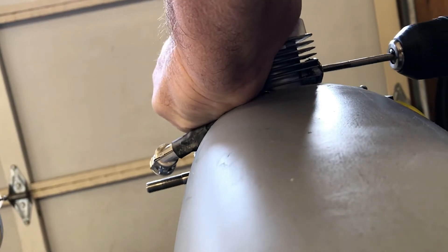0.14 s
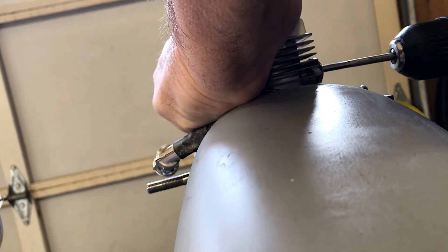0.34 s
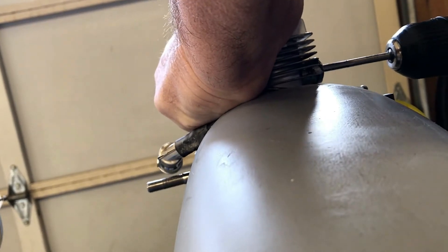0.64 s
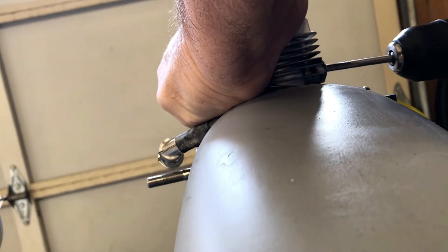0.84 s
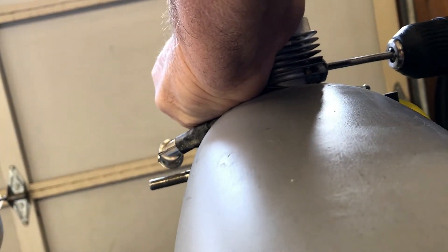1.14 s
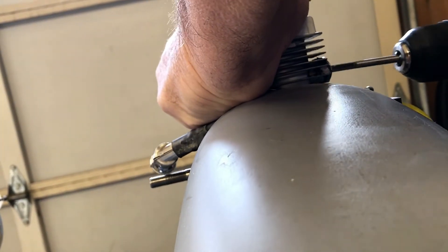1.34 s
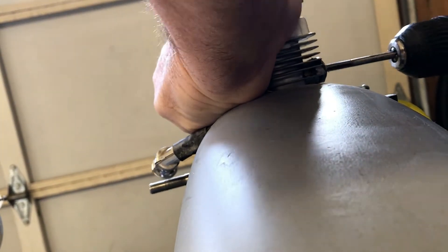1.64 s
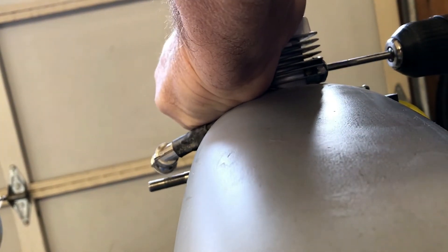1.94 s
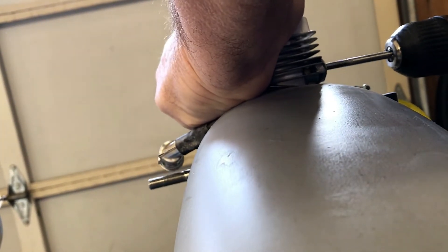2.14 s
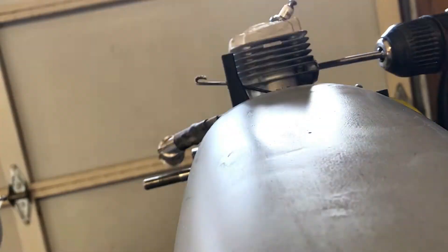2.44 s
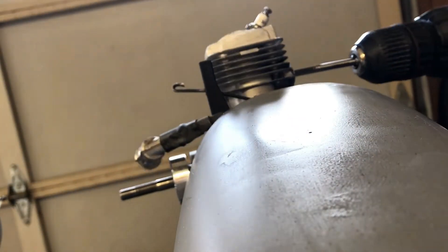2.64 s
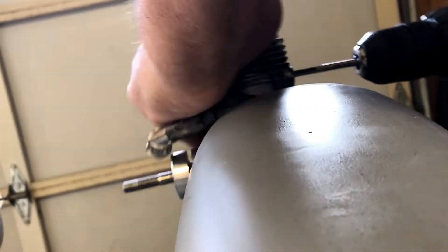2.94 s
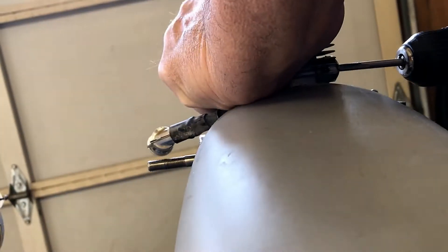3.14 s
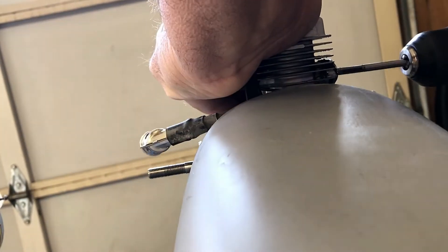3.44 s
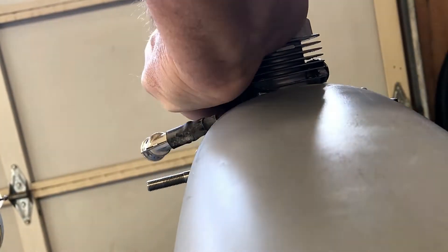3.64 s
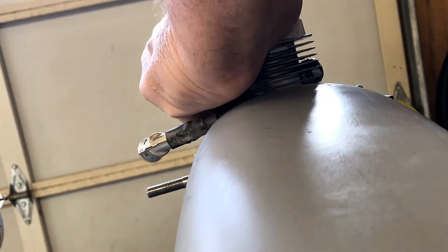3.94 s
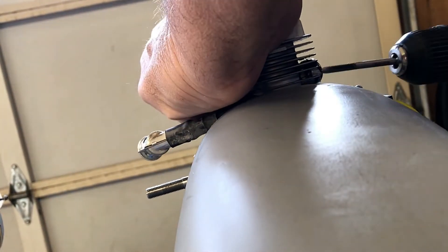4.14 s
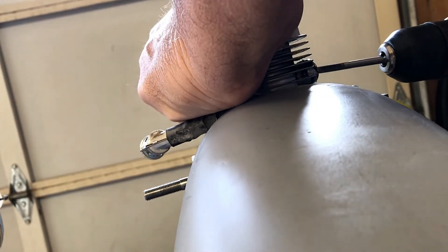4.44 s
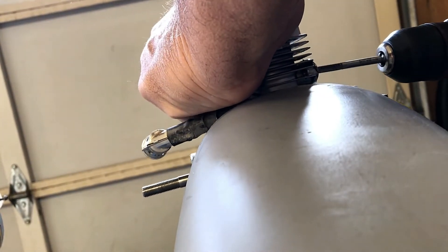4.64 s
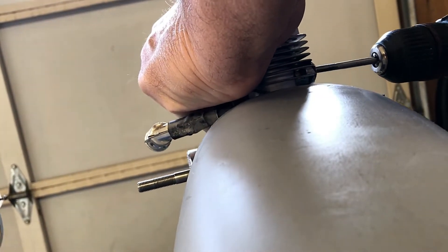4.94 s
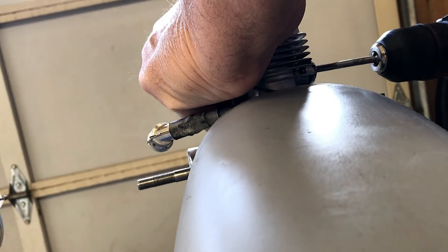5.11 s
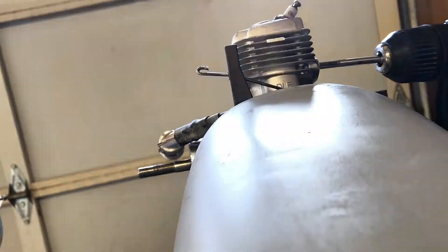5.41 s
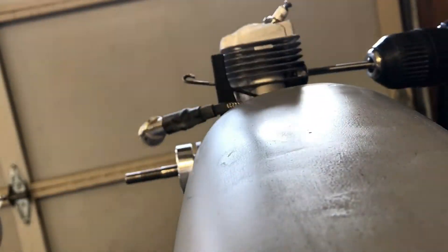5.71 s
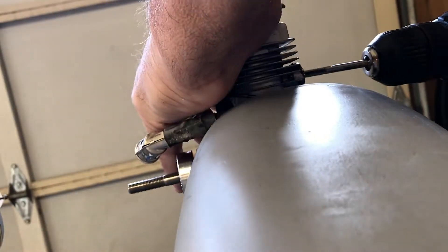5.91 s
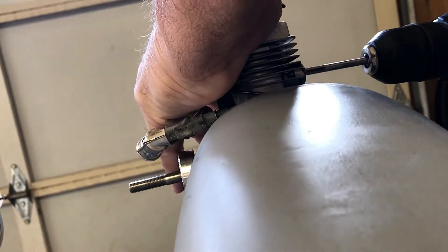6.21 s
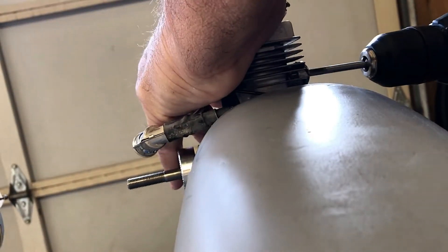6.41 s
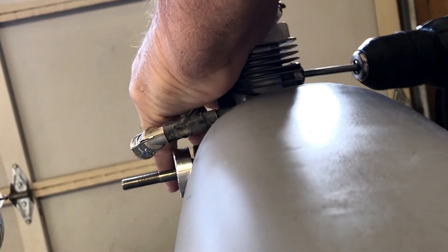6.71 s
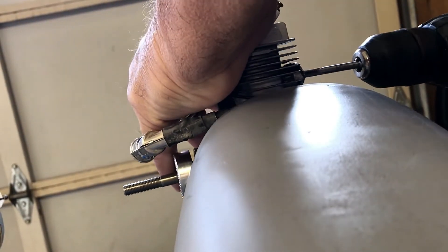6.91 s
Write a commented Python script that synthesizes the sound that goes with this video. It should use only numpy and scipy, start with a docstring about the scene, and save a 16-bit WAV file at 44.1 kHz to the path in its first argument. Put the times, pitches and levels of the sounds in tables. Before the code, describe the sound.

A thread tool is turned by hand inside an aluminium engine cylinder, heard close in a quiet garage. Fizzy, streaky metal rubbing comes in separate strokes, with thin high whistles early on and small ticks of swarf. Clicks, light knocks and finger brushing fill the gaps; a strong rasp bursts out midway, and rough squeaks crowd the final strokes.

```python
"""A bright, streaky hiss comes first, close by over faint steady air: a thread tool is wound by hand,
stroke by stroke, into a hole in an aluminium engine cylinder. Shaped noise makes the rubbing, short noise
flares the rasps, paired sines the whistles, and resonant overtone series the stick-slip squeaks.
Between strokes the loose tool clicks and knocks: noise bursts, also heard through the cylinder's
resonances. A garage answers briefly and faintly; both channels are alike."""
import sys
import numpy as np
from scipy import signal
from scipy.fft import rfft, irfft, next_fast_len
from scipy.io import wavfile
from scipy.ndimage import map_coordinates

SR = 44100
rng = np.random.default_rng(int(sys.argv[2]) if len(sys.argv) > 2 else 0)


def store_pcm(level_fs):
    """Save levels as 16-bit WAV."""
    pcm = np.round(np.clip(level_fs, -1, 1) * 32767).astype(np.int16)
    wavfile.write(sys.argv[1], SR, np.atleast_2d(pcm).T)


N = 311542
TOP_HZ = 15950  # upper band limit

# resonances of the cylinder: f/Hz, width/Hz, level/dB
CASTING = [(720, 380, -2), (1610, 140, 12.5), (2820, 770, -3.5), (4350, 580, -8), (5320, 400, -6)]
# steady stick-slip of the edge: t/s, length/s, slip rate f/Hz, ring f/Hz, level/dB of the ring
LOCKS = [(0.161, 0.058, 816, 7400, -41), (1.926, 0.026, 2310, 4720, -43), (2.008, 0.025, 816, 6900, -44.5),
         (2.189, 0.05, 2755, 8300, -35), (2.264, 0.03, 7540, 7500, -34.5),
         (4.953, 0.0349, 1230, 15000, -45), (5.162, 0.02, 2766, 8280, -39),
         (5.287, 0.018, 4710, 9400, -34.5)]


def amp(db):
    """Level and gain: 20 dB is a factor of ten in amplitude."""
    return 10 ** (np.asarray(db) / 20)


def unit(x):
    """Normalisation to an rms of 1."""
    return x / np.sqrt(np.mean(x ** 2) + 1e-20)


def along(points, hz):
    """Spectral gain, by interpolating (f/Hz, level/dB) points on a log frequency axis."""
    f, db = np.transpose(points)
    return amp(np.interp(np.log(hz + 1), np.log(f), db))


def wobble(rate, size=N):
    """Smooth random fluctuation: a spline through Gaussian knots, rate of them a second."""
    knots = rng.standard_normal(4096)
    return map_coordinates(knots, [np.arange(size) * rate / SR], mode="wrap")


def filtered(x, response):
    """Linear filtering: the spectrum of x times a frequency response."""
    m = next_fast_len(len(x) + SR // 4)
    spectrum = rfft(x, m) * response(np.fft.rfftfreq(m, 1 / SR))
    return irfft(spectrum, m)[:len(x)]


def coloured(x, spectrum):
    """Spectral shaping of x, at an rms of 1."""
    return unit(filtered(x, lambda hz: along(spectrum, hz)))


def add(track, s, sound):
    """Superposition: a sound joins the track at time s."""
    start = max(round(s * SR), 0)
    track[start:start + len(sound)] += sound[:max(len(track) - start, 0)]


def gate(length, attack=0.0015, release=0.0011):
    """Time axis and linear attack-hold-release envelope of one contact, in s."""
    t = np.arange(int(length * SR)) / SR
    return t, np.clip(np.minimum(t / attack, (length - t) / release), 0, 1)


def phase_of(hz):
    """Phase in radians as the integral of a moving frequency."""
    return 2 * np.pi * np.cumsum(hz) / SR


def casting(x, modes=CASTING):
    """Modal response: a force excites damped resonances, summed with alternating sign."""
    def response(f):
        total = 0
        for k, (centre, width, db) in enumerate(modes):
            damping = 1j * f * width
            total = total + (-1) ** k * amp(db) * damping / (centre * centre - f * f + damping)
        return total
    return filtered(x, response)


def crack(t, t60, tail_db):
    """Impact noise: exponential decay to -60 dB in t60 s with a slower tail, at a peak of 1."""
    decay = amp(-60 * t / t60) + amp(tail_db - 60 * t / 0.13)
    burst = rng.standard_normal(len(t)) * decay
    return burst / np.abs(burst).max()


def tightness():
    """Varying normal force: tight and loose spots pass as smooth swells and dips, in dB."""
    # the thread binds (+) or runs free (-): t/s of the middle, length/s, change/dB
    binds = [(0.101, 0.17, 9.5), (0.452, 0.073, 5), (0.716, 0.18, 6.5), (0.827, .13, 3.5),
             (0.94, 0.074, -7), (1.847, 0.3, 13.5), (1.942, 0.13, -7), (4.623, 0.052, 6),
             (4.761, 0.27, 4.5), (4.894, 0.047, 6), (5.076, .12, 7.5), (5.151, 0.15, -6),
             (5.194, 0.023, 6.5), (5.248, 0.023, 8.5), (5.921, 0.047, 12.5), (6.285, 0.26, 5.5),
             (6.395, 0.12, 8), (6.469, 0.066, -9.5)]
    tight_db = np.zeros(N)
    for s, length, db in binds:
        add(tight_db, s - length / 2, db * np.hanning(int(length * SR)))
    return tight_db


def air():
    """Stationary noise: the quiet air of the garage."""
    # spectrum of the air: f/Hz, relative level/dB per Hz
    air_spectrum = [(140, -63), (300, -11), (560, -1), (1600, -5.5), (2500, -11), (8000, -21.5)]
    return amp(-51.0) * coloured(rng.standard_normal(N), air_spectrum)


def garage(x):
    """Reverberation: the walls answer with a short, exponentially decaying tail of noise."""
    t = np.arange(SR // 2) / SR
    decay = amp(-60 * t / 0.12)  # 60 dB in 0.12 s
    tail = coloured(rng.standard_normal(len(t)), [(100, -6), (1500, 10), (12000, -16)]) * decay
    return signal.fftconvolve(x, tail / np.linalg.norm(tail))[:N]


def grip():
    """Light friction: the fingers brush over the metal as they shift, a fluctuating noise."""
    # shifts of the fingers: t/s, length/s, level/dB before the fluctuation
    grips = [(2.379, 0.11, -43), (2.658, 0.44, -49.5), (3.569, 0.066, -41.5), (3.678, 0.57, -51),
             (5.388, 0.13, -48.5)]
    touch = np.zeros(N)
    for s, length, db in grips:
        add(touch, s, amp(db) * np.hanning(int(length * SR)))
    return touch * amp(9 * np.tanh(wobble(150))) * unit(rng.standard_normal(N))


def swarf():
    """Random impulses: tiny chips crack in the thread and tick faintly in the casting."""
    chance, size = rng.random(N), rng.standard_normal(N)
    impulses = (chance < 55 / SR) * amp(9 * np.tanh(size))  # 55 a second on average
    one_tick = crack(np.arange(SR // 100) / SR, t60=.003, tail_db=-60)
    ticks = signal.fftconvolve(impulses, one_tick)[:N]
    return amp(-36.5) * ticks + amp(-31) * casting(ticks)


def blows(contacts, modes):
    """Impact excitation: dull contacts are heard only through the resonances they strike."""
    out, t = np.zeros(N), np.arange(SR // 20) / SR
    for s, db in contacts:
        ring = casting(crack(t, t60=.012, tail_db=-13), modes)
        add(out, s, amp(db) * ring / np.abs(ring).max())
    return out


def thuds():
    """Coupled modes: the cylinder rocks on its support, whose broad low mode replaces its own lowest."""
    # rocking contacts: t/s, peak level/dB
    rocks = [(2.907, -25), (2.927, -32), (2.94, -18.5), (2.965, -22.5), (4.135, -25.5)]
    # mode of the support: f/Hz, width/Hz, level/dB
    support = [(720, 820, 12)]
    return blows(rocks, CASTING[1:] + support)


def knocks():
    """Impact excitation: the loose tool taps the cylinder and its modes answer."""
    # taps: t/s, peak level/dB
    taps = [(2.435, -30), (2.987, -22), (3.178, -24), (5.466, -29.5), (5.592, -22), (5.595, -27),
            (5.664, -21), (5.668, -21), (6.73, -25.5)]
    return blows(taps, CASTING)


def clicks():
    """Damped impact: edges snap over chips with little bass; the hand damps the metal's ring."""
    # sharp metal contacts: t/s, peak level/dB of the snap before filtering
    contacts = [(.98, -24), (1.1277, -10.5), (1.1886, -11), (1.6356, -8), (2.677, -23), (2.707, -22),
                (2.9958, -15), (3.5165, -11), (3.7624, -7.5), (3.818, -18), (3.988, -21), (4.003, -25),
                (4.019, -22), (4.032, -20.5), (4.135, -22), (5.4165, -19), (6.652, -19), (6.7086, -11)]
    snap, t = np.zeros(N), np.arange(SR // 20) / SR
    for s, db in contacts:
        add(snap, s + 0.00082, amp(db) * crack(t, t60=0.0068, tail_db=-31.0))
    corner_hz = 900  # first-order high-pass
    direct = filtered(snap, lambda hz: 1j * hz / (1j * hz + corner_hz))
    return direct + amp(-6.0) * casting(snap)


def slips():
    """Release of stored twist: sliding noise flares up quickly and dies a little more slowly."""
    # rasps: t/s of the peak, hiss level/dB, body level/dB, both before the swell
    rasps = [(0.152, -24.5, -38.5), (0.241, -27.5, -49), (.299, -28, -47), (1.57, -33.5, -29),
             (1.979, -19, -29.5), (2.056, -22, -38), (2.245, -20.5, -30.5), (2.309, -19, -30.5),
             (3.178, -24.5, -55), (3.67, -9.5, -13.5), (3.925, -20.5, -26.5)]
    # spectra: f/Hz, relative level/dB per Hz
    hiss_spectrum = [(2500, -20.5), (11000, 1.5), (16000, -0.5)]
    body_spectrum = [(200, -6), (900, -3.5), (2700, 1.5), (4500, -0.5), (8000, -10)]
    hiss, body, t = np.zeros(N), np.zeros(N), np.arange(SR // 10) / SR
    middle = t.mean()
    width = np.where(t < middle, .0045, .006)  # s, rise and fall
    swell = 1.07 * np.exp(-.5 * ((t - middle) / width) ** 2)
    for s, hiss_db, body_db in rasps:
        add(hiss, s - middle, amp(hiss_db) * swell)
        add(body, s - middle, amp(body_db) * swell)
    hiss = hiss * coloured(rng.standard_normal(N), hiss_spectrum)
    return hiss + body * coloured(rng.standard_normal(N), body_spectrum)


def stick_slip(pitch, edge_hz, upper_gain=0):
    """Relaxation oscillation: uneven overtones, heard through the body and through the edge's ring."""
    # response of the body: f/Hz, level/dB
    body_response = [(900, -3.5), (1800, -2), (2700, -4), (3600, -26)]
    k = np.arange(1, 15)[:, None]
    flare = amp(3.2 * np.array([wobble(110, len(pitch)) for _ in k]))
    phase = k * phase_of(pitch) + 0.3 * rng.standard_normal(k.shape)
    overtones = flare * np.sin(phase) * (k * pitch < TOP_HZ)

    def mode(ratio):
        return np.hypot(k * pitch / ratio - edge_hz, 380) ** -1.3

    resonance = mode(1) + upper_gain * mode(1.85)
    body = unit(np.sum(overtones * along(body_response, k * pitch), axis=0))
    ring = unit(np.sum(overtones * resonance, axis=0))
    return body, ring


def squeaks():
    """Stick-slip: pitch settles after a rough break-away, the ring rises mid-squeak, light ones stay rough."""
    # squeaks: t/s, length/s, starting f/Hz, settled f/Hz, body level/dB, peak ring level/dB,
    # f/Hz the ring is driven towards (lowered by the arch and the cap below)
    bursts = [(2.682, 0.011, 1120, 1010, -32.5, -64, 2600), (2.712, 0.025, 1006, 796, -37, -43, 2650),
              (2.746, 0.034, 767, 900, -40, -52, 1900), (2.763, 0.038, 960, 775, -38.5, -45, 2580),
              (2.829, 0.049, 1280, 890, -39, -60, 1920), (4.259, 0.03, 1454, 1094, -37.5, -31.5, 5380),
              (5.853, 0.05, 1015, 906, -29.5, -37, 6940), (5.919, 0.033, 1040, 848, -36, -25.5, 4160),
              (5.952, 0.03, 1016, 855, -33, -28, 5400), (5.992, 0.028, 926, 933, -35, -22.5, 7800),
              (6.015, 0.047, 880, 917, -32.5, -29.5, 8060), (6.089, 0.036, 1114, 850, -36.5, -24, 8260),
              (6.398, 0.06, 908, 820, -34, -39, 6100), (6.477, 0.0186, 858, 906, -32, -61, 3260),
              (6.514, 0.031, 867, 910, -34, -28, 5400), (6.54, 0.049, 850, 744, -38, -32.5, 3860),
              (6.889, 0.02, 1365, 837, -29, -25.5, 6800), (6.909, 0.027, 946, 792, -33.5, -25.5, 3590),
              (6.94, 0.034, 820, 993, -32.5, -32.5, 4200)]
    settle_s, ring_arch = 0.016, 0.71  # ring_arch: share by which the ring starts and ends lower
    edge_mode_hz = 5720  # the ring climbs no higher
    grit_spectrum = [(300, -30), (1700, 14), (14000, -7)]
    out = np.zeros(N)
    for s, length, first_hz, last_hz, body_db, ring_db, ring_hz in bursts:
        light = np.clip(amp(-33 - body_db), .7, 2)  # a weaker body means a lighter contact
        t, envelope = gate(length, release=0.0026 * light ** 2)
        rough = light ** 1.4 + 2 * np.exp(-t / .005)
        jitter = .013 * wobble(90, len(t)) + .018 * rough * wobble(900, len(t))
        glide = last_hz + (first_hz - last_hz) * np.exp(-t / settle_s)
        pitch = glide * (1 + jitter)
        swell = np.sin(np.pi * t / length)
        edge_hz = np.minimum(ring_hz * (1 - ring_arch * (1 - swell)), edge_mode_hz)
        body, ring = stick_slip(pitch, edge_hz, 0.11 * ring_hz / edge_mode_hz)
        pulses = 1 + np.cos(phase_of(pitch))
        grit = coloured(rng.standard_normal(len(t)) * pulses, grit_spectrum)
        chatter = unit(amp(1.1 * rough * wobble(300, len(t))))
        voice = amp(body_db) * (body + amp(-24) * rough * grit) + amp(ring_db) * swell * ring
        add(out, s, envelope * chatter * voice)
    return out


def locks():
    """Steady stick-slip of the edge: thin, high tones over a low note or overtones."""
    sag = 0.137  # share by which the low note falls as the tool slows
    out = np.zeros(N)
    for s, length, slip_hz, ring_hz, db in LOCKS:
        t, envelope = gate(length)
        rate = slip_hz * (1 + .007 * wobble(600, len(t)))
        ring = stick_slip(rate, ring_hz)[1]
        body = unit(np.sin(phase_of(rate * (1 + sag * (.5 - t / length)))))
        add(out, s, amp(db) * envelope * (ring + amp(-9.5) * body))
    return out


def squeals():
    """Self-excited vibration: one mode takes over, drifts with the hand, flickers with the contact."""
    # cutting squeals: t/s, length/s, first f/Hz, last f/Hz, level/dB
    glides = [(0.039, 0.029, 1543, 1840, -41), (0.092, 0.02, 1880, 1410, -39),
              (1.347, 0.092, 1588, 1940, -43.5), (3.164, 0.25, 14000, 13410, -41),
              (3.444, 0.074, 2630, 2890, -38.5), (4.379, 0.062, 1590, 1734, -40.5),
              (4.55, 0.25, 14400, 13900, -43)]
    out = np.zeros(N)
    for s, length, first_hz, last_hz, db in glides:
        t, envelope = gate(length, attack=0.0094, release=0.0066)
        drift = 70 * wobble(866, len(t)) + 55 * wobble(62.0, len(t))  # Hz
        phase = phase_of(np.linspace(first_hz, last_hz, len(t)) + drift)
        flicker = amp(3 * wobble(70, len(t)))
        octave = amp(-10) * np.sin(2 * phase) * (2 * first_hz < TOP_HZ)
        add(out, s, amp(db) * envelope * unit(flicker * (np.sin(phase) + octave)))
    return out


def whistles():
    """Mode splitting: two close modes of the edge sing and part as the thread binds; the lower has an octave."""
    # whistles: t/s, length/s, upper mode's first, middle and last f/Hz, level/dB before the wobble
    songs = [(0.307, 0.62, 7760, 8400, 8400, -38.5), (1.199, 0.23, 7700, 7500, 7550, -40.5),
             (4.217, 0.2, 8570, 7700, 7430, -42.5), (4.426, 0.11, 8230, 7950, 8570, -39)]
    tight_db = tightness()
    split_hz = 560 + 77 * np.maximum(tight_db, 0)  # grows by 77 Hz per dB
    out = np.zeros(N)
    for s, length, first_hz, middle_hz, last_hz, db in songs:
        t, envelope = gate(length, attack=0.0055, release=0.036)
        curve = np.polyfit([0, .5, 1], [first_hz, middle_hz, last_hz], 2)
        high_hz = np.polyval(curve, t / length)
        low_hz = high_hz - split_hz[int(s * SR):][:len(t)]
        low = phase_of(low_hz + 95 * wobble(830, len(t)))
        high = phase_of(high_hz + 95 * wobble(830, len(t)))
        tone = np.sin(low) + np.sin(high) + amp(-7.5) * np.sin(2 * low)
        level = amp(db + 1.6 * wobble(59.6, len(t)))
        add(out, s, level * envelope * unit(tone))
    return out * amp(np.minimum(tight_db, 0))  # loose spots weaken the song


def contact_pressure():
    """Friction force follows normal force: the hand leans in or eases off; tightness rides on top."""
    # strokes of the hand: start t/s, end t/s, level/dB at the start and at the end, before tightness
    strokes = [(0.019, 1.014, -40, -41), (1.181, 1.447, -37.5, -32), (1.679, 2.219, -41, -43.5),
               (3.06, 3.535, -38, -32), (4.217, 5.355, -37, -42), (5.796, 6.657, -44.5, -32.5),
               (6.785, 7.079, -37.5, -32.5)]
    pressure = np.zeros(N)
    for start, end, first_db, last_db in strokes:
        t, envelope = gate(end - start, attack=0.0018, release=0.027)
        add(pressure, start, envelope * amp(np.linspace(first_db, last_db, len(t))))
    return pressure * amp(tightness())


def sliding():
    """Stick reduces sliding noise: gain of the rubbing, 8 dB down during a lock."""
    drop_db = np.zeros(N)
    for s, length, *_ in LOCKS:
        add(drop_db, s, -8 * gate(length)[1])
    return amp(drop_db)


def scrape(streak_db, fall_hz_per_s):
    """Roughness noise: tool marks give spectral ridges that wander, and glide down under braking."""
    hz, t, z = signal.stft(rng.standard_normal(N), SR, nperseg=256)
    # tight spots brake the tool; fall_hz_per_s is the glide at a braking of 1
    braking = np.interp(t * SR, np.arange(N), amp(tightness()) - 1 + wobble(30))
    slant = hz[:, None] + fall_hz_per_s * np.cumsum(braking * t[1])
    place = [slant / 330 % 511, np.broadcast_to(t / .016, z.shape)]  # one knot per 330 Hz and 16 ms
    ridges = map_coordinates(rng.standard_normal((512, 512)), place)
    return signal.istft(z * amp(streak_db * np.tanh(ridges)), nperseg=256)[1][:N]


def rubbing():
    """Sliding friction: each stroke drags thread over thread, a grind and a streaky fizz."""
    # spectra of the grind and of the thread's sharp crests: f/Hz, relative level/dB per Hz
    grind_spectrum = [(30, -10.5), (700, -10), (1650, -0.5), (2100, -5), (3000, -1), (5500, -2),
                      (7300, 3.5), (15500, -8)]
    fizz_spectrum = [(6000, -23.5), (8600, -6.5), (10800, -2), (13000, -6), (15500, -3.5)]
    tremble_db = 2.2 * wobble(45) + 1.75 * wobble(300)  # the hand trembles
    effort = contact_pressure() * amp(tremble_db)
    grind = coloured(rng.standard_normal(N), grind_spectrum)
    fizz = coloured(scrape(streak_db=17, fall_hz_per_s=45000), fizz_spectrum)
    return effort * (amp(-1.82) * grind + amp(1.7) * fizz)


def scene():
    """Superposition of the tool, its room and the steady air, alike in both channels."""
    tool = sliding() * rubbing() + locks() + whistles() + squeals() + squeaks() + slips() + clicks()
    tool = tool + knocks() + thuds() + swarf() + grip()
    return np.tile(tool + amp(-27.5) * garage(tool) + air(), (2, 1))


def record(dry):
    """Band limitation: an ideal low-pass keeps nothing above the upper limit."""
    return np.array([filtered(channel, lambda hz: hz < TOP_HZ) for channel in dry])


dry = scene()
out = record(dry)
store_pcm(out)
```